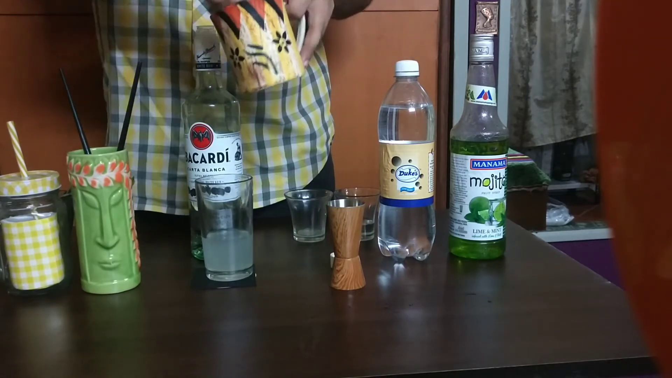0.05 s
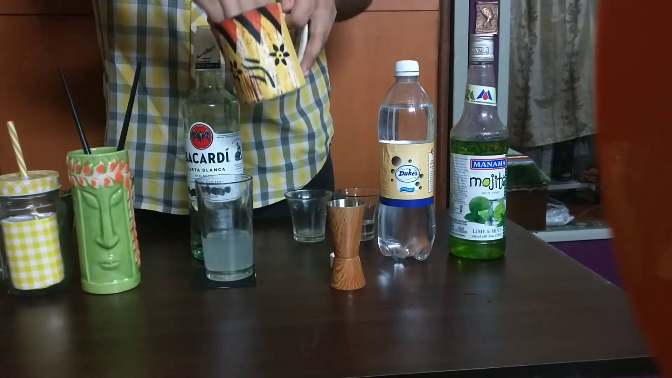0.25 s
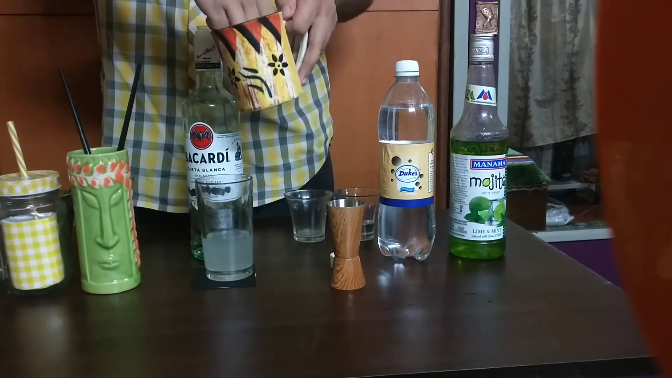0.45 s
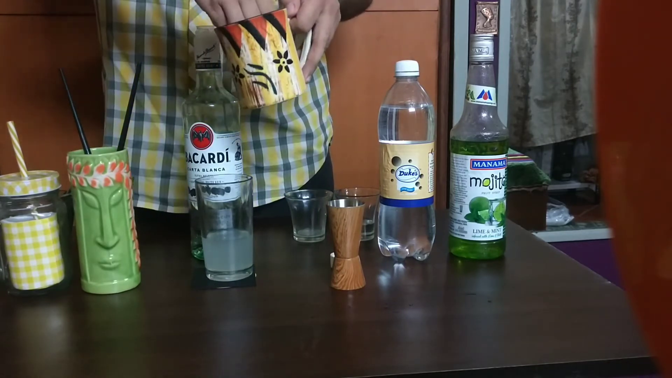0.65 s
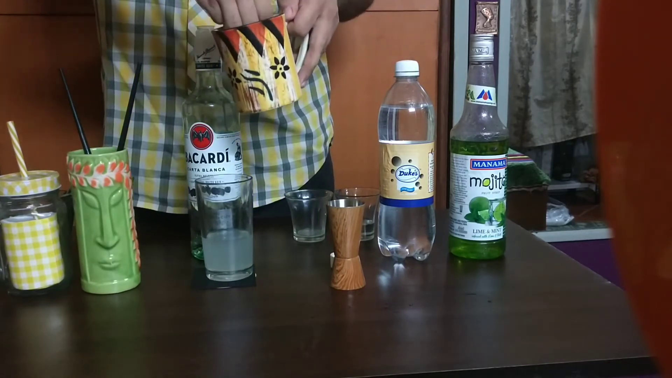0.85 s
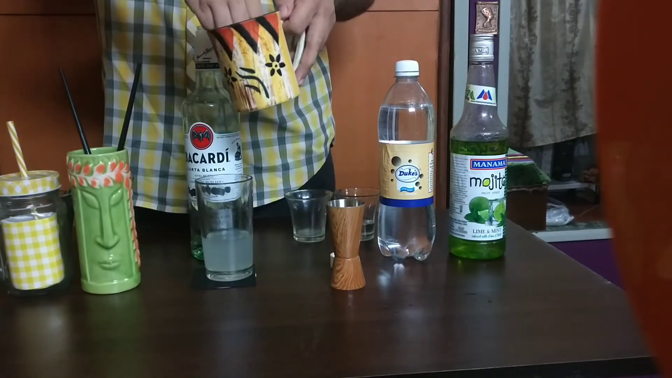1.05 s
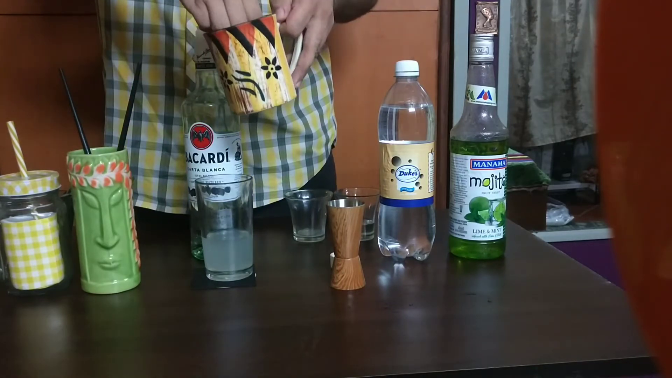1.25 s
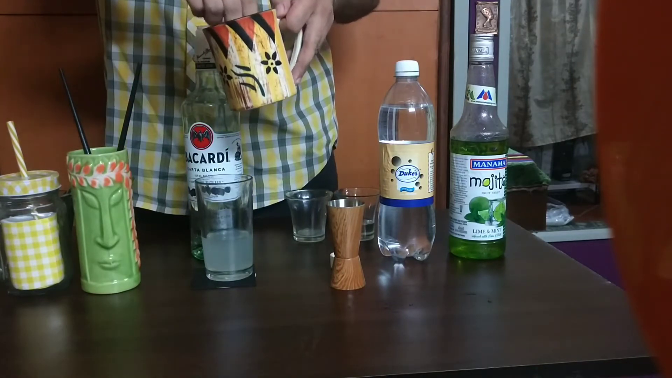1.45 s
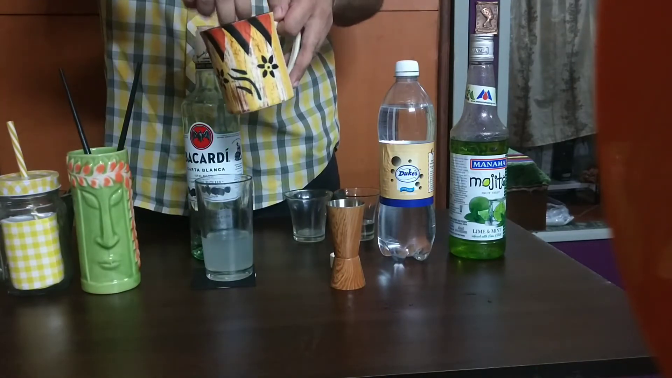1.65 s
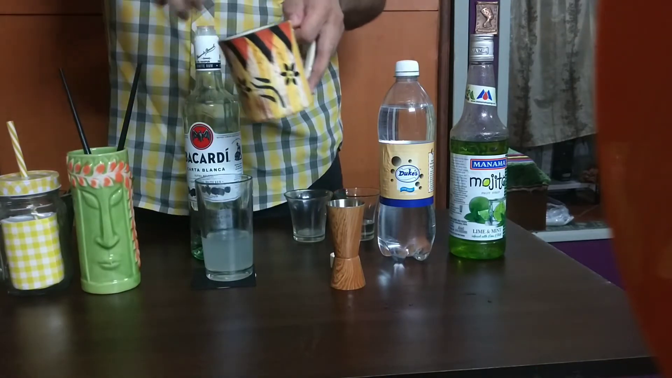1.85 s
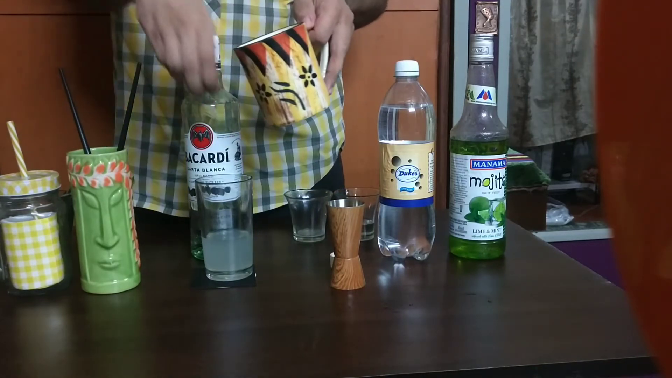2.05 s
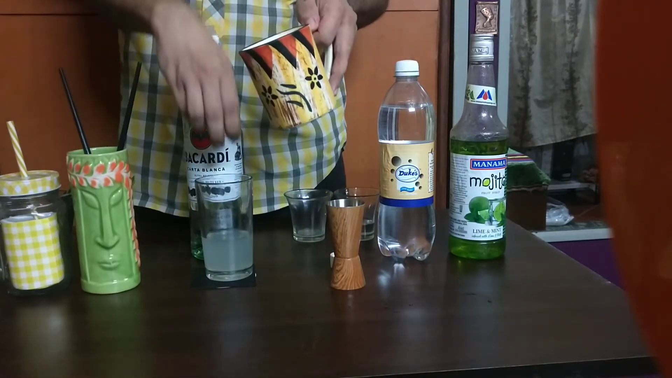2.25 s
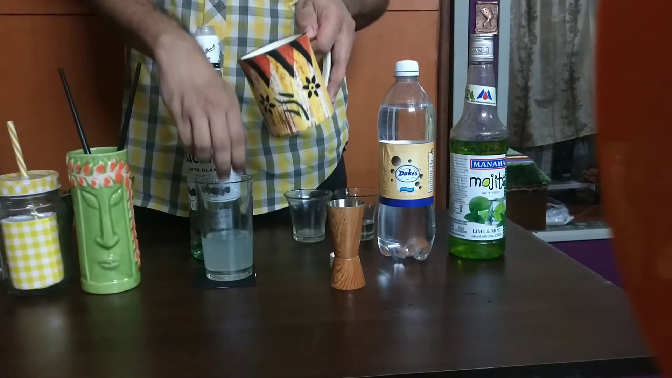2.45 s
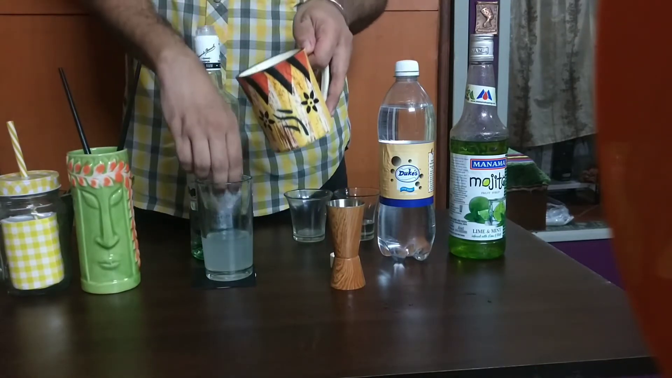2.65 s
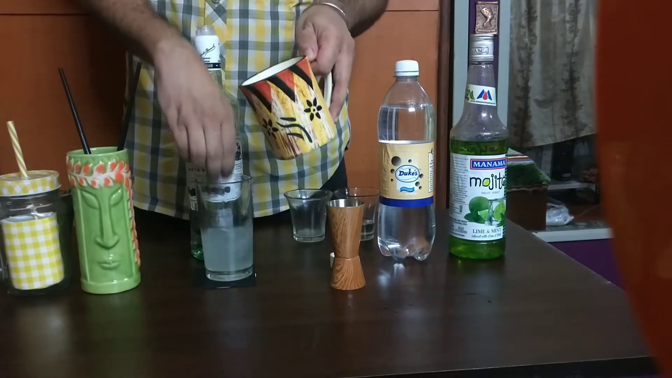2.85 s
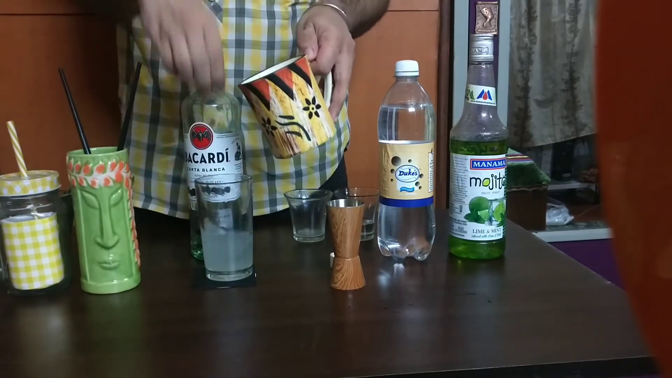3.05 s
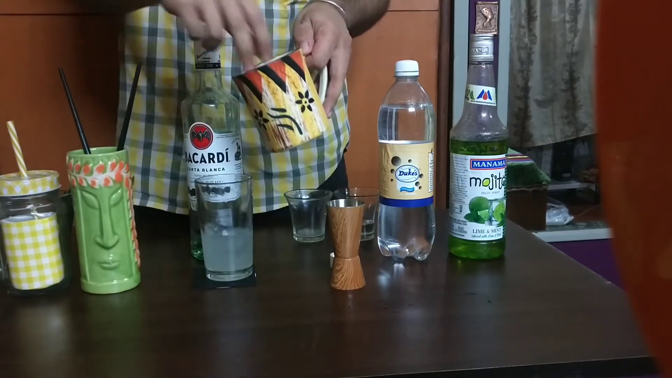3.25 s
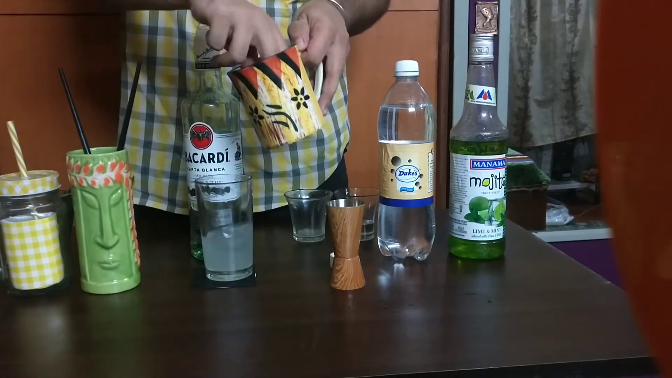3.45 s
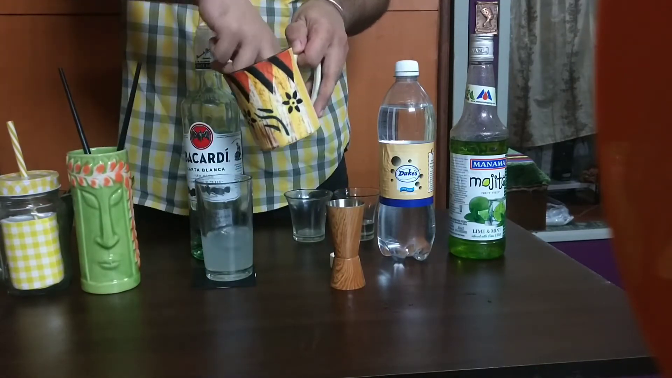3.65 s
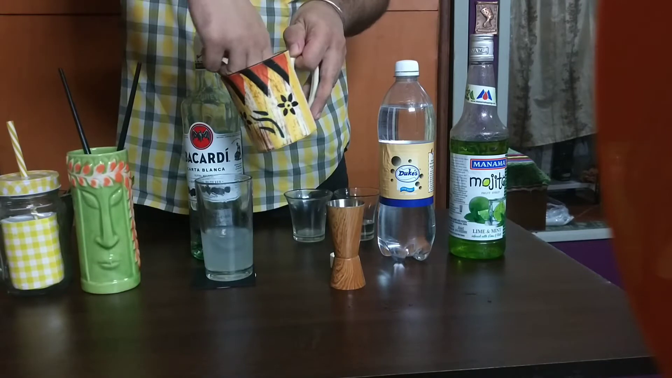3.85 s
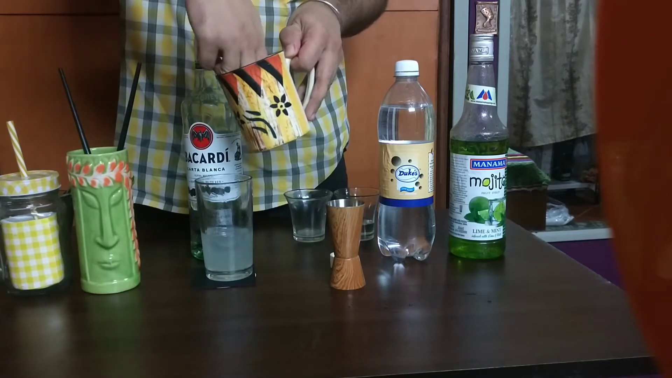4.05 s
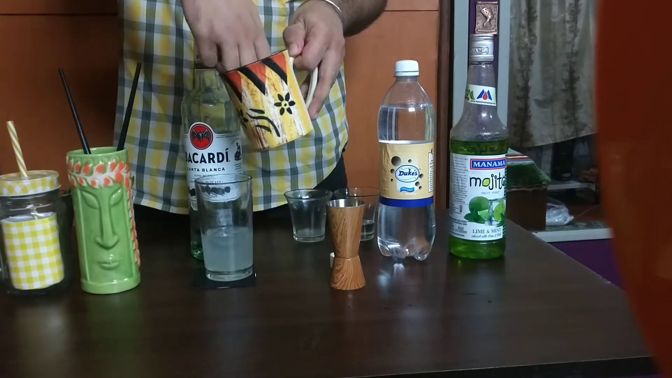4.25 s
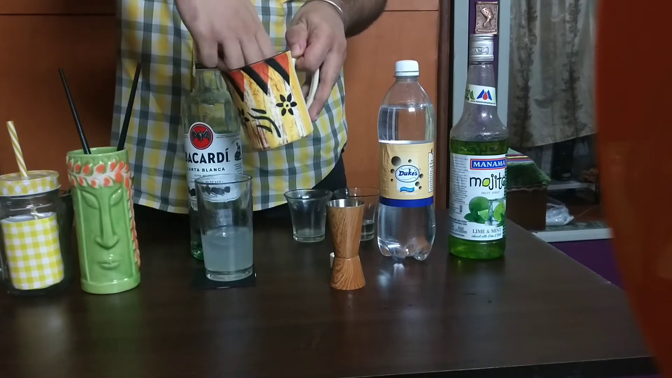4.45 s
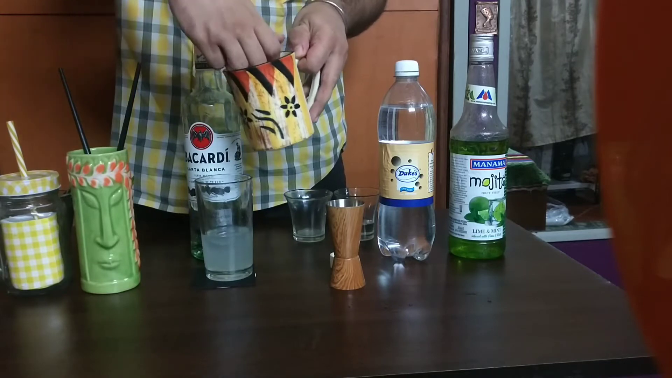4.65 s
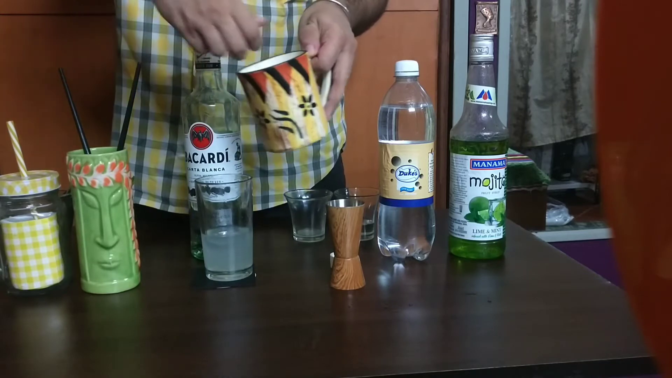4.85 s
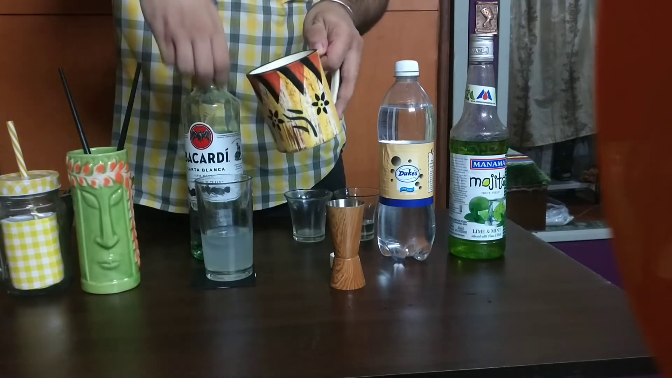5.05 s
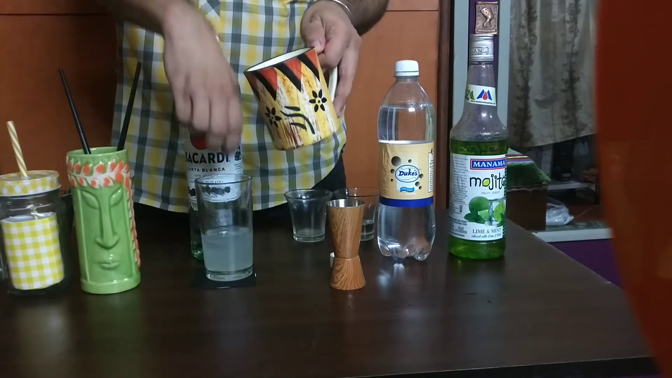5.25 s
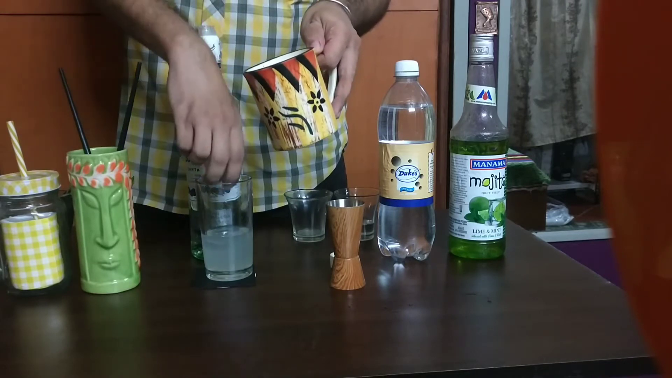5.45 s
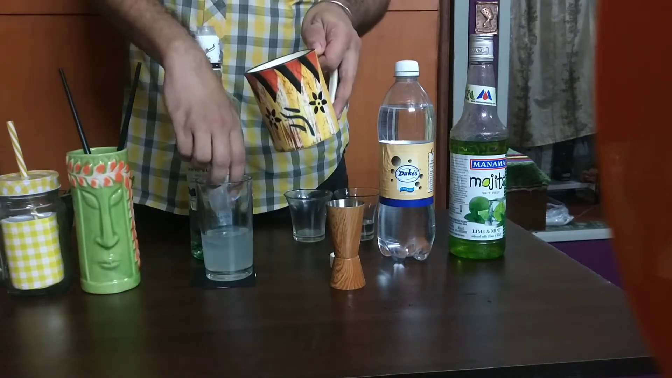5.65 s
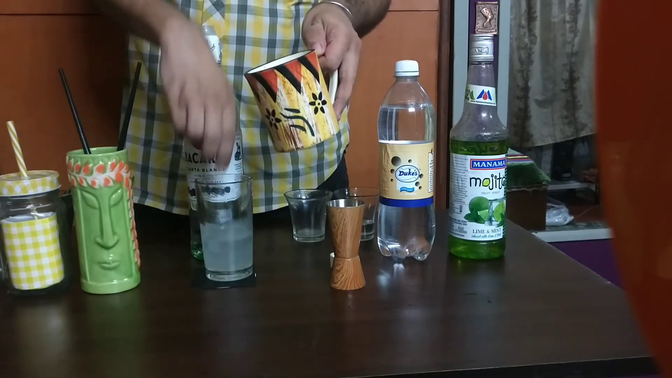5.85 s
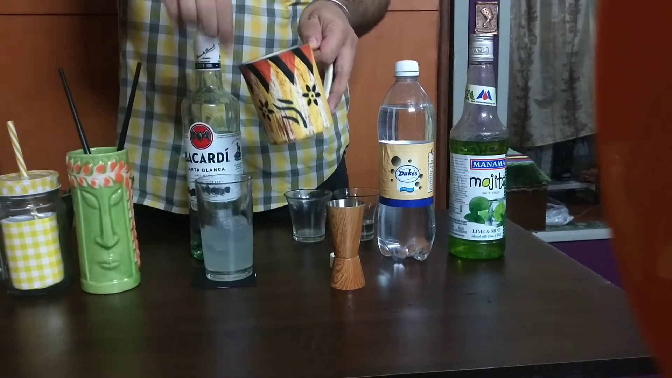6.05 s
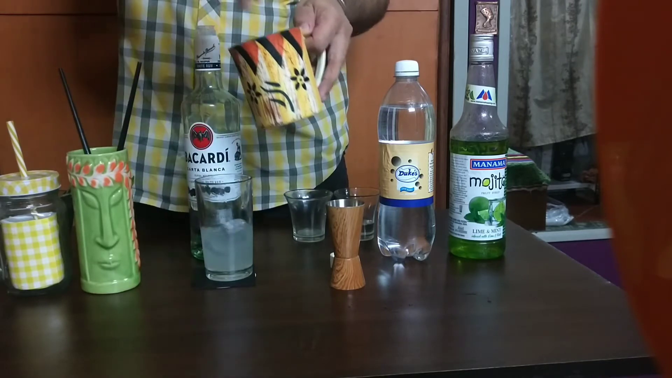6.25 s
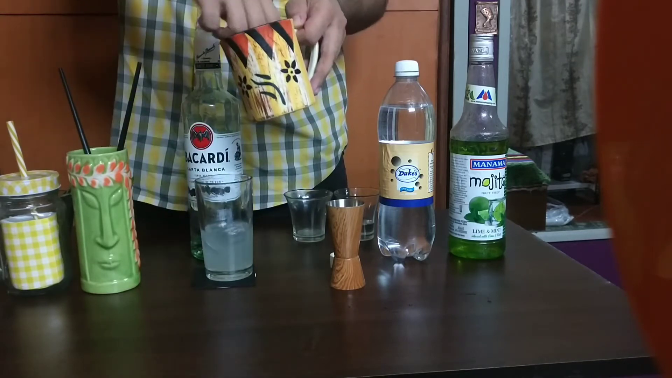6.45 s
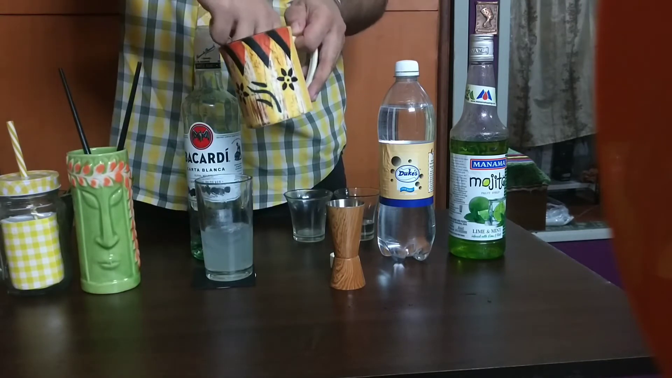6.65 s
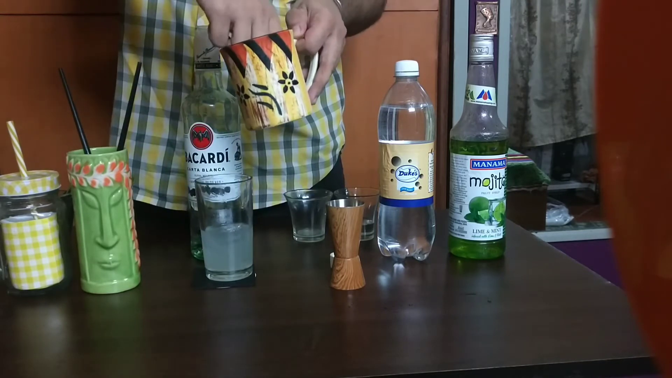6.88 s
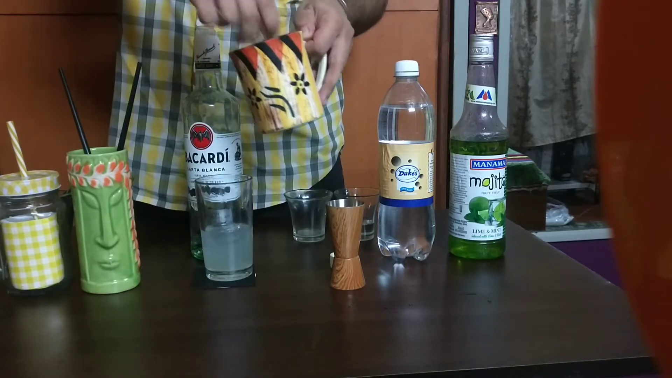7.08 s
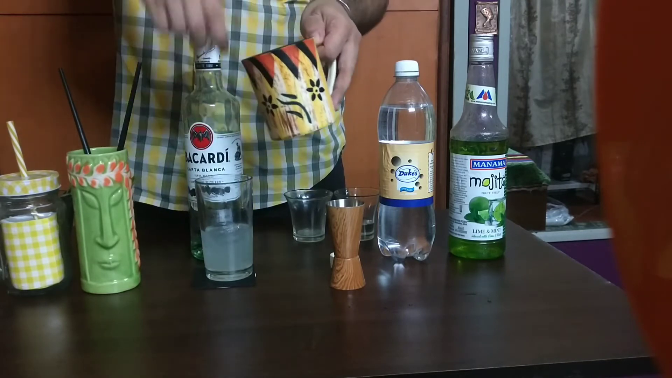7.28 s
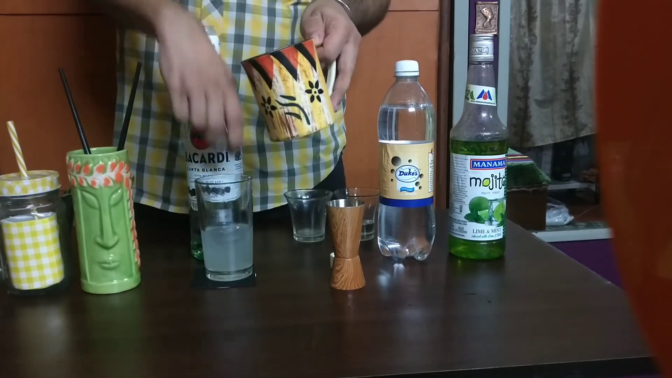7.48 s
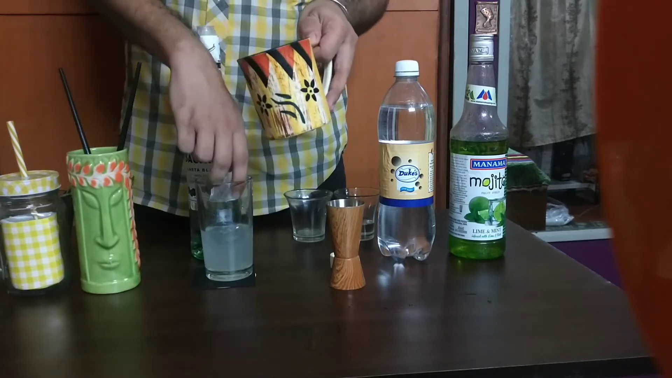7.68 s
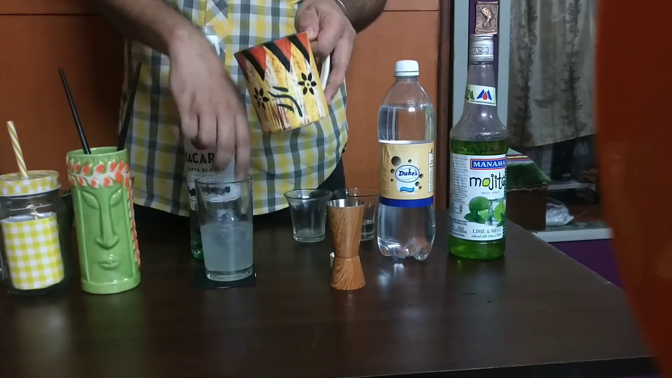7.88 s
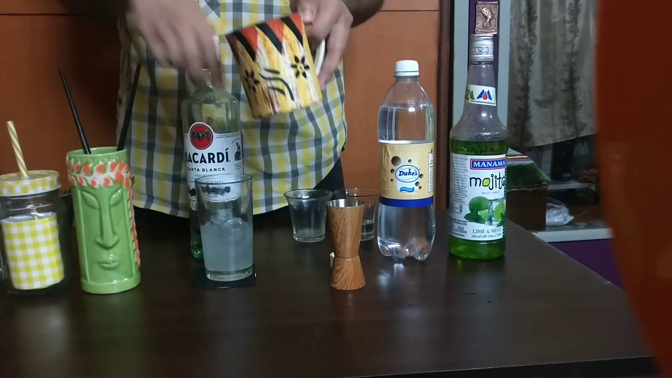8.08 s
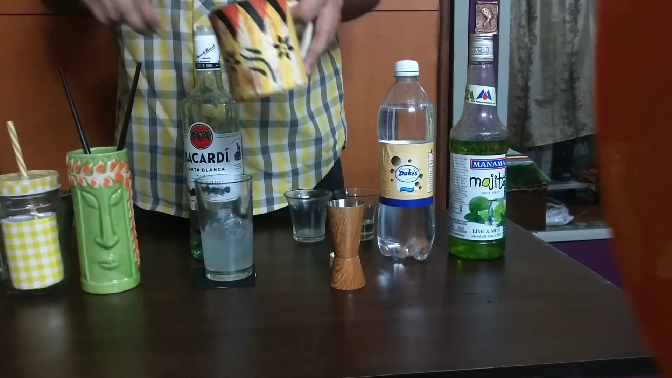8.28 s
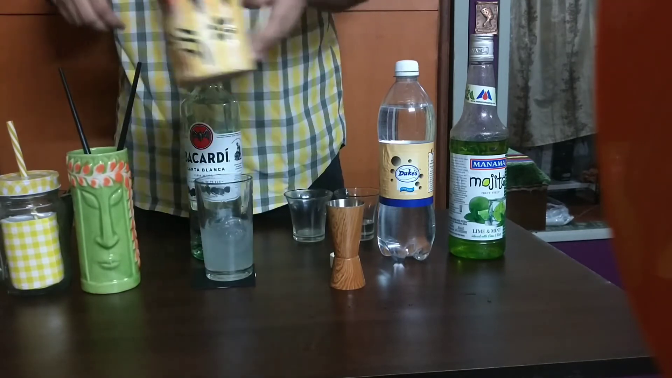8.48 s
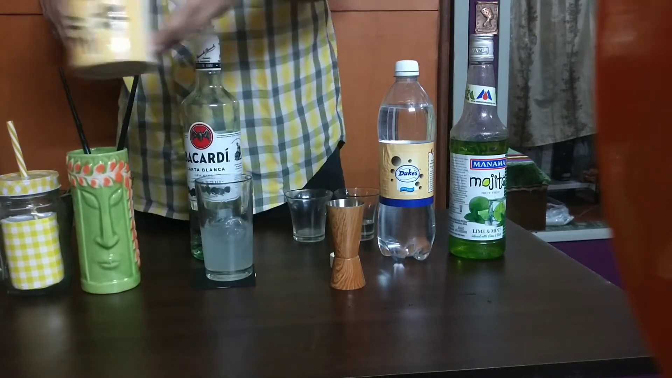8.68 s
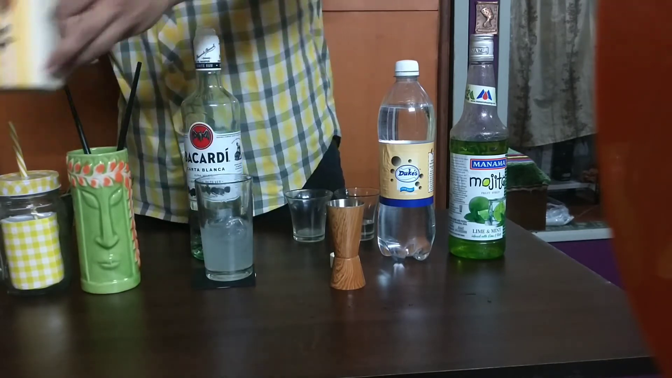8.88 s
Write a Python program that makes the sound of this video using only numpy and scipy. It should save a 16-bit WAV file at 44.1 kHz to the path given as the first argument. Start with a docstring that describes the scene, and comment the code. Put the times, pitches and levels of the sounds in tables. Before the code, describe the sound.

Close stereo microphones catch dull ceramic rattles as ice is shoved about in a mug, a pause, then bright clinks as cubes land in a partly filled glass. More rummaging leads to a second, longer-ringing drop, and a brief last rummage to a loud third one with a splash. Faint cloth rustle follows, over low hum and hiss in a small lively room.

```python
"""In a small hard room with a humming fan, fingers rummage among ice cubes in a china mug.
From 2.6 s cubes drop into a tall glass with a little drink: clink on the wall, landing, table knock, bubbles.
The mug is rummaged again, cubes fall at 5.5 s, there is a last short rummage, then more fall at 7.8 s.
Cloth rustles faintly at 1.7 s and at the end. A close pair of microphones hears it all, the right one later.
Contacts are shaped noise bursts, vessels and bubbles are decaying sines, slides and cloth are click streams."""
import sys
import numpy as np
from scipy import signal
from scipy.fft import rfft, irfft
from scipy.io import wavfile

SR = 44100
rng = np.random.default_rng(int(sys.argv[2]) if len(sys.argv) > 2 else 0)


def output_pcm(signal):
    """Save a mono or channel-first signal as 16-bit PCM at the path in sys.argv[1].

    Samples are clipped to [-1, 1] before scaling.
    """
    pcm = np.clip(np.atleast_2d(signal).T, -1, 1) * 32767
    wavfile.write(sys.argv[1], SR, np.round(pcm).astype(np.int16))


N = 393372
TIME = np.arange(N) / SR
EDGE_HZ = 15950  # upper band limit
FIRM_DB = -38.5  # table level of an ordinary firm blow, before any trim


def amp(db):
    """Decibels to gain."""
    return 10 ** (np.asarray(db) / 20)


def unit(x):
    """Scaled to rms 1."""
    return x / np.sqrt(np.mean(x ** 2) + 1e-20)


def read(points, hz):
    """A table of (frequency [Hz], value) joined by lines on a log frequency axis."""
    f, value = np.transpose(points)
    return np.interp(np.log(hz + 1), np.log(f + 1), value)


def add(mix, s, sound):
    """Lays a sound into the mix at s seconds."""
    part = mix[max(round(s * SR), 0):][:len(sound)]
    part += sound[:len(part)]


def bins(size=4096):
    """Frequencies [Hz] at which filters are drawn."""
    return np.fft.rfftfreq(size, 1 / SR)


def shape(x, db):
    """Minimum-phase filter, by folding the cepstrum, with the given gain [dB] at each of the bins."""
    cepstrum = irfft(np.log(amp(np.maximum(db, -100))))
    half = len(cepstrum) // 2
    cepstrum[1:half] *= 2
    cepstrum[half + 1:] = 0
    impulse = irfft(np.exp(rfft(cepstrum)))[:half]
    return signal.oaconvolve(x, impulse)[:len(x)]


def level_power(db):
    """Shifts a spectrum [dB] so that it leaves the power of white sound unchanged."""
    return db - 10 * np.log10(np.mean(amp(db) ** 2))


def colour(x, points, tilt_db=0):
    """Gives a white sound a spectrum, tilted [dB per octave] above 1 kHz, at unchanged power."""
    hz = bins()
    db = read(points, hz) + tilt_db * np.log2(np.clip(hz, 1000, EDGE_HZ))
    return shape(x, level_power(db))


def bump(hz, octaves):
    """Bell of height 1 around hz, over the bins."""
    return np.exp(-(np.log2((bins() + 1) / hz) / octaves) ** 2)


def dying(t60, size=SR):
    """One second of exponential decay, falling 60 dB in t60 seconds."""
    return np.exp(-np.log(1000) * TIME[:size] / max(t60, 1e-4))


def ring(modes):
    """Struck body: decaying sines of (frequency [Hz], level [dB], t60 [s])."""
    return sum(amp(db) * dying(t60) * np.sin(2 * np.pi * hz * TIME[:SR]) for hz, db, t60 in modes)


def crack(t60):
    """Brittle contact: a burst of noise of fixed energy."""
    fall = dying(t60)
    burst = fall * rng.standard_normal(SR)
    return burst * np.linalg.norm(fall) / np.linalg.norm(burst)


def grains(per_s, spread_db):
    """A stream of tiny clicks of uneven size and random sign, at rms 1."""
    size = amp(spread_db * np.minimum(rng.exponential(1, N), 3)) * rng.choice([-1, 1], N)
    return unit(size * (rng.random(N) < per_s / SR))


def stroke(s, rise_s, fall_s, db):
    """Speed of a sliding contact: it picks up, then friction slows it evenly to rest."""
    t = TIME - s
    return amp(db) * np.clip(np.minimum(t / rise_s, 1 - (t - rise_s) / fall_s), 0, 1)


def vessel(ice, modes, body_db):
    """Whatever the ice does also rings the vessel around it."""
    body = ring(modes)
    return ice + amp(body_db) * signal.fftconvolve(ice, body / np.sqrt(np.linalg.norm(body)))[:N]


# decay of the small hard room: (frequency [Hz], t60 [s])
ROOM_T60 = [(200, 0.19), (1000, 0.31), (3000, 0.32), (6000, 0.32), (10000, 0.26), (15000, 0.17)]


def room_tail(build_s=0.00035):
    """Dense reflections that build up quickly, each band dying at its own speed."""
    hz, t, z = signal.stft(rng.standard_normal(SR), SR, nperseg=256)
    t60 = read(ROOM_T60, hz)[:, None]
    z = z * np.exp(-np.log(1000) * t / t60) / np.sqrt(t60)
    tail = signal.istft(z, SR, nperseg=256)[1][:SR] * (1 - np.exp(-TIME[:SR] / build_s))
    return tail / np.linalg.norm(tail)


def place(x, wet, side, lag_s=.0002):
    """Direct sound, later at the right microphone, plus a separate room tail at each; side tilts the pair."""
    send, side_db = shape(x, read(wet, bins())), read(side, bins())
    mean_db = 10 * np.log10((amp(side_db) + amp(-side_db)) / 2)  # keeps the mean power of the pair
    left = x + signal.fftconvolve(send, room_tail())[:N]
    right = np.pad(x, (round(lag_s * SR), 0))[:N] + signal.fftconvolve(send, room_tail())[:N]
    return np.array([shape(left, side_db / 2 - mean_db), shape(right, -side_db / 2 - mean_db)])


# spectrum of the low rumble: (frequency [Hz], relative level [dB])
RUMBLE_COLOUR = [(20, -41.5), (30, -28), (42, -9.5), (60, -2), (85, 2.5), (130, -2.5), (190, -7),
                 (260, -16.5), (400, -29.5), (800, -77)]
# spectrum of the microphone hiss: (frequency [Hz], relative level [dB])
HISS_COLOUR = [(150, -6), (250, -4.5), (400, -8), (700, -9.5), (1000, -14.5), (2000, -16), (4000, -19.5),
               (7500, -26), (10000, -23.5), (13000, -19.5), (15500, -19.5)]


def rumble_and_hiss(rumble_db=-66, hiss_db=-73.5):
    """Low rumble and microphone hiss, each steady noise of its own spectrum."""
    rumble, hiss = rng.standard_normal((2, N))
    return amp(rumble_db) * colour(rumble, RUMBLE_COLOUR) + amp(hiss_db) * colour(hiss, HISS_COLOUR)


def drift():
    """Slow random wander of standard deviation 1 at its knots, about three a second."""
    knots = np.linspace(0, N / SR, num=30)
    return np.interp(TIME, knots, rng.standard_normal(len(knots)))


def hum_tone(hz, db, level_waver=0.15, phase_waver_rad=0.6):
    """One sine of the hum, wandering slowly in strength and phase."""
    strength = amp(db) * np.sqrt(2) * (1 + level_waver * drift())
    return strength * np.sin(2 * np.pi * hz * TIME + phase_waver_rad * drift())


# fan and mains hum: (frequency [Hz], rms level [dB])
HUM = [(58, -67), (100, -62.5), (116, -76), (150, -85), (250, -86), (300, -83.5), (400, -94.5)]
# how alike rumble and hiss are at the two microphones: (frequency [Hz], likeness [0 to 1])
LIKENESS = [(60, 0.71), (150, 0.87), (300, .7), (700, 0.13), (2000, 0), (15000, 0.025)]


def background(left_db=0.42):
    """Wavering fan and mains hum over low rumble and microphone hiss, a shade louder on the left."""
    middle, b = rumble_and_hiss(), rumble_and_hiss()
    same = np.clip(read(LIKENESS, bins()), 0, .999)
    side = shape(b, 10 * np.log10((1 - same) / (1 + same)))
    hum = sum(hum_tone(hz, db) for hz, db in HUM)
    return np.array([(middle + side + hum) * amp(left_db), (middle - side + hum) * amp(-left_db)])


# the sleeve brushes as the arm moves: (time [s], rise [s], fall [s], peak level [dB])
BRUSHES = [(1.68, 0.13, 0.086, -78.5), (7.95, 0.17, .21, -75.5), (8.32, 0.013, 0.027, -58),
           (8.33, .05, 1.4, -79.5)]
# spectrum of the cloth: (frequency [Hz], relative level [dB])
SLEEVE_COLOUR = [(200, -15), (600, -4.5), (1100, 2.5), (1800, -1), (3500, -0.5), (6000, -15),
                 (12000, -11.5)]


def sleeve():
    """Soft rustle of cloth: dense tiny clicks that follow the speed of each brush."""
    return sum(stroke(*row) for row in BRUSHES) * colour(grains(per_s=2800, spread_db=3.5), SLEEVE_COLOUR)


# a finger shoves the cubes, which slide to rest: (time [s], at rest [s], level before trim [dB])
SHOVES = [(0, 0.104, -49), (0.084, 0.192, -43), (0.179, 0.365, -50.5), (0.382, 0.524, -53.5),
          (3.341, 3.638, -50), (3.43, 3.672, -49.5), (3.63, 3.997, -51), (3.995, 4.15, -56),
          (4.118, 4.286, -58), (4.382, 4.705, -56), (4.646, 4.754, -48.5), (6.428, 6.484, -52.5),
          (6.484, 6.72, -49.5), (6.616, 6.815, -58), (6.838, 6.95, -60), (6.973, 7.087, -58)]
# spectrum of ice on china, for scrapes and knocks: (frequency [Hz], relative level [dB])
MUG_COLOUR = [(240, -26), (400, -22.5), (569, -17.5), (809, -3), (914, -8), (1280, -8.5), (1750, -11),
              (2400, -0.5), (2670, -5.5), (3060, -4), (5390, -14), (6190, -12), (8030, -23), (10300, -9),
              (15500, -15)]


def mug_scrape(trim_db=-9.0, note_db=13, note_octaves=0.26, count=8, rise_s=0.002):
    """After each shove the cubes slip in tiny jerks and small knocks, every contact point with its own pitch."""
    drag = sum(stroke(s, rise_s, rest_s - s, db) for s, rest_s, db in SHOVES)
    slips = np.zeros(N)
    for hz in np.geomspace(1600, 6500, count):
        slips += shape(grains(per_s=24, spread_db=3.5), note_db * bump(hz, note_octaves))
    return amp(trim_db) * drag * colour(unit(slips), MUG_COLOUR, tilt_db=-0.87)


# cubes knock inside the mug: (time [s], level before trim [dB], treble snap [dB], pitch [Hz])
MUG_KNOCKS = [(0.0276, -35, -11.5, 2360), (0.0966, -28.5, -14, 3400), (.1123, -34.5, -3, 2480),
              (.1845, -36.5, -10, 5940), (.2054, -42.5, 5, 1760), (.419, -35.5, -13, 2370),
              (0.461, -33.5, -6.5, 2260), (0.7858, -52, -9, 2420), (.9822, -49.5, -40, 2490),
              (3.3422, -39.5, -7.5, 2330), (3.4703, -34, -7, 2280), (3.5029, -31.5, -18, 2270),
              (3.5613, -30, -16, 3040), (3.5779, -36.5, -28, 3100), (3.6392, -44, 9, 3080),
              (3.7728, -34.5, -19, 3020), (3.8411, -40, -21, 3000), (3.967, -40.5, -10, 3300),
              (4.0017, -32, -28, 3520), (4.129, -28.5, 1, 6650), (4.381, -31.5, 4, 2210),
              (4.4879, -40, -3.5, 3060), (4.6545, -33, -6, 2470), (4.658, -32, -3, 3500),
              (4.803, -43.5, -28, 3400), (4.814, -52, -26, 3500), (6.4842, -42.5, 1, 2120),
              (6.5444, -41, 3.5, 3450), (6.6105, -35.5, -28, 3700), (6.6288, -43, 10, 3500),
              (6.8605, -43, -34, 2320), (6.9464, -41, -6, 2430), (6.985, -37, -1.5, 2030)]
# lows of a knock up to firm [dB], and their change per dB above it
LOW_DB, LOW_PER_DB = -7, -0.72


def mug_knocks(trim_db=1.5, knock_t60=0.0085, note_db=8, note_octaves=0.25):
    """Each knock is a crack with its own pitch and snap; above a firm blow, harder means thinner lows."""
    out = np.zeros(N)
    for s, level_db, snap_db, hz in MUG_KNOCKS:
        low_db = LOW_DB + LOW_PER_DB * max(level_db - FIRM_DB, 0)
        hardness = [(1400, low_db), (2000, 0.95), (4000, 0), (9000, snap_db)]  # (frequency [Hz], gain [dB])
        db = read(MUG_COLOUR, bins()) + read(hardness, bins()) + note_db * bump(hz, note_octaves)
        add(out, s, amp(level_db + trim_db) * shape(crack(knock_t60), level_power(db)))
    return out


# bubbles: (time [s], middle pitch at the start [Hz], level before trim [dB])
BUBBLES = [(2.874, 647, -39.5), (2.898, 600, -45), (2.919, 1046, -37.5), (2.93, 1020, -63),
           (5.938, 1450, -51.5), (6.016, 1047, -46), (6.319, 956, -53.5), (7.927, 1210, -50.5),
           (8.17, 1080, -63)]


def bubbles(rise_per_s=6.3, onset_s=0.00053, t60=0.0235, spread=0.067, stagger_s=0.00239, trim_db=-3, count=3):
    """Air breaks into a few bubbles of like size; each rings briefly and rises in pitch near the surface."""
    out, t = np.zeros(N), TIME[:SR]
    swell = dying(t60) * (1 - np.exp(-t / onset_s))
    for s, hz, db in BUBBLES:
        for k, size in enumerate(rng.permutation(np.linspace(-1, 1, count))):
            turns = hz * (1 + spread * size) * (t + rise_per_s * t ** 2 / 2) + rng.random()
            add(out, s + k * stagger_s, amp(db + trim_db) * swell * np.sin(2 * np.pi * turns))
    return out


# a cube lands in the drink:
# (time [s], table thud before trim [dB], air column before trim [dB], splash [dB])
LANDINGS = [(2.608, -53, -60, -54), (2.65, -74, -59, -54), (2.716, -47, -69, -53), (2.768, -57, -54, -73),
            (2.819, -49.5, -63, -70), (2.874, -49, -55, -62.5), (5.499, -44.5, -67.5, -69),
            (5.695, -41.5, -49.5, -60), (5.711, -44.5, -79, -54), (5.742, -48.5, -50, -72),
            (7.779, -45, -53, -30.5), (7.806, -42.5, -44, -38)]
# modes of the knocked table: (frequency [Hz], relative level [dB], t60 [s])
TABLE_MODES = [(197.8, -0.5, 0.21), (263, -3.5, 0.11), (339, -11.5, 0.33), (514, 0.5, 0.04)]
# modes of the air above the drink: (frequency [Hz], relative level [dB], t60 [s])
AIR_MODES = [(1205, 6.5, 0.088), (1025, 12, 0.037), (1343, -3, 0.065)]
# spectrum of the spray: (frequency [Hz], relative level [dB])
SPLASH_COLOUR = [(200, 0), (500, -5), (800, -12.5), (1200, 2), (1900, -15.5), (3400, 7), (4200, -1.5),
                 (5050, 10), (5600, -11), (6300, 2.5), (7500, 2), (9000, 5), (15500, -0.5)]


def landings(splash_t60=0.1, thud_trim_db=-2.0, air_trim_db=-3, rise_s=0.0073):
    """The cube thumps glass and table, sounds the air column and throws a fine spray."""
    out, spray = np.zeros(N), np.zeros(N)
    soft = 1 - np.exp(-TIME[:SR] / rise_s)
    for s, table_db, column_db, splash_db in LANDINGS:
        thud = amp(table_db + thud_trim_db) * ring(TABLE_MODES)
        column = amp(column_db + air_trim_db) * ring(AIR_MODES)
        add(out, s, soft * (thud + column))
        add(spray, s, amp(splash_db) * dying(splash_t60))
    return out + colour(spray * grains(per_s=3600, spread_db=4.0), SPLASH_COLOUR)


# ice on the glass wall: (time [s], tick level before trim [dB], pitch of the cube [Hz],
# ring level [dB], ring pitch [Hz], ring t60 [s])
CLINKS = [(2.6086, -36, 10060, -32, 2617, 0.083), (2.648, -34, 14000, -26, 2616, 0.068),
          (2.7666, -51, 9500, -45.5, 2598, 0.93), (2.8779, -50.5, 13700, -40.5, 2588, 0.27),
          (2.989, -62, 10370, -61, 2590, 0.2), (3.1237, -52, 9460, -39.5, 2598, 0.39),
          (5.498, -39.5, 13900, -32, 2588, 0.048), (5.631, -64, 9800, -47, 2603, .55),
          (5.6568, -38.5, 11440, -25, 2592, 0.86), (5.733, -34, 13500, -42, 2570, 0.33),
          (5.759, -81, 9100, -27, 2558, 0.26), (5.803, -69, 9100, -42, 2580, .5),
          (5.847, -45.5, 9000, -46, 2577, 0.91), (5.9763, -50, 8860, -42.5, 2580, 0.46),
          (6.1409, -54, 9150, -63, 2562, 0.77), (6.404, -61.5, 9050, -48.5, 2584, 0.064),
          (7.7807, -22.5, 9740, -30, 2584, 0.22), (7.8068, -45, 9800, -31.5, 2566, 0.39)]
# higher round modes of the wall: (ratio to the lowest, level before hardness [dB], longest t60 [s])
WALL_MODES = [(2.471, -11, .3), (2.42, -17.5, .3), (2.56, -14, .081), (4.408, -4, .11), (5.37, -18, .08)]
# a harder blow is a shorter contact, so the overtones are brighter:
# their tilt at a firm blow [dB per octave], and its growth per dB of tick
FIRM_OVERTONE_DB, OVERTONE_PER_DB = -7, 0.29


def glass_wall(hard_rise_s=0.00027, soft_rise_s=0.0079, catch_s=0.0013, twin_hz=29, twin_db=-16):
    """The wall rings until the next contact catches it. Its lowest mode is a pair of twins;
    the place of the blow picks one, and the other beats weakly against it."""
    out, t = np.zeros((2, N)), TIME[:SR]
    ends = [row[0] for row in CLINKS[1:]] + [N / SR]
    for (s, tick_db, _, db, hz, t60), end in zip(CLINKS, ends):
        over_db = FIRM_OVERTONE_DB + OVERTONE_PER_DB * (tick_db - FIRM_DB)
        rise_s = np.interp(tick_db, [-70, -58], [soft_rise_s, hard_rise_s])  # a grazing cube swells the ring gently
        upper = int(hz > 2581)
        other_hz = hz - twin_hz if upper else hz + twin_hz
        modes = [(hz, 0, t60), (other_hz, twin_db, t60)]
        for ratio, mode_db, mode_t60 in WALL_MODES:
            modes.append((hz * ratio, mode_db + over_db * np.log2(ratio), min(mode_t60, t60)))
        held = (1 - np.exp(-t / rise_s)) * np.exp(-np.maximum(s + t - end, 0) / catch_s)
        add(out[upper], s, amp(db) * held * ring(modes))
    return out


# spectrum of a tick: (frequency [Hz], relative level [dB])
TICK_COLOUR = [(50, -13), (150, -1.5), (500, -10.5), (1100, -0.5), (1800, -10), (3300, -0.5), (5000, -8),
               (5600, -2), (6400, 10), (7800, -24.5), (9500, 1.5), (15500, 0)]


def ice_tick(tilt_db, cube_hz, crack_t60=0.0092, cube_db=-5, cube_t60=0.024):
    """A sharp crack and the brief high note of the cube itself."""
    return colour(crack(crack_t60), TICK_COLOUR, tilt_db) + ring([(cube_hz, cube_db, cube_t60)])


# ice knocking on ice, or cracking in the drink:
# (time [s], level before trim [dB], tilt [dB per octave], pitch of the cube [Hz])
TICKS = [(2.709, -38.5, 2, 13900), (2.7173, -35.5, 1, 12850), (2.811, -51, -4.5, 10500),
         (2.987, -57, 12, 10300), (5.6945, -39, -2.5, 9960), (5.7076, -45, -6, 9800),
         (5.7291, -35, 15, 9320), (5.7424, -37, 23, 13400), (5.7489, -39, 12, 8970),
         (5.9375, -54.5, 0, 9150), (6.049, -50, -2, 9200), (7.7774, -22, 1, 9030), (7.8037, -28, 7, 10040),
         (8.1667, -53, 5, 9100), (8.5298, -48.5, 18, 9080), (8.5492, -53, 7, 13600)]
# a harder clink is brighter: tilt at a firm blow [dB per octave], and its growth per dB of tick
FIRM_TICK_TILT_DB, TICK_TILT_PER_DB = -1.6, 0.14


def ice_in_glass(clink_trim_db=3, tick_trim_db=3):
    """Contacts of cubes with the wall or other ice, and cracks in the drink, each a sharp tick."""
    out = np.zeros(N)
    for s, db, hz, *_ in CLINKS:
        tilt_db = FIRM_TICK_TILT_DB + TICK_TILT_PER_DB * (db - FIRM_DB)
        add(out, s, amp(db + clink_trim_db) * ice_tick(tilt_db, hz))
    for s, db, tilt_db, hz in TICKS:
        add(out, s, amp(db + tick_trim_db) * ice_tick(tilt_db, hz))
    return out


# stiff modes of the thick glass base and the cubes in it: (frequency [Hz], relative level [dB], t60 [s])
BASE_MODES = [(3420, -19, 0.23), (5060, -11, 0.19), (4970, -12, .2), (5760, -4, .14), (6265, 9, 0.34),
              (6750, -29, .12), (8830, -7, .14), (9866, -17, .16)]
# modes of the china mug: (frequency [Hz], relative level [dB], t60 [s])
MUG_MODES = [(816, 0, 0.19), (1866, -7, 0.11), (2145, 1, 0.21), (2424, 3.5, 0.085), (3170, 4, 0.034),
             (3590, -1, 0.077), (4770, -12, 0.055), (6280, 5, 0.055), (10100, -6, 0.026)]
# room against direct sound, (frequency [Hz], level [dB]): glass, its ring,
# mug knocks, and handling of the mug, which faces away
GLASS_WET = [(200, -6.5), (1000, 6), (4000, 4.5), (7000, -4.5), (10000, -4), (15000, -6.5)]
RING_WET = [(500, -5.5), (2600, -8.5), (6400, -2.5), (12000, 0.5)]
KNOCK_WET = [(300, 7.5), (3000, -2), (6000, 7.5), (12000, 4)]
MUG_WET = [(300, 8.5), (3000, 4.5), (12000, 6)]
# left microphone against right, (frequency [Hz], level [dB]): glass, lower twin, upper twin, mug
GLASS_SIDE = [(200, -3.5), (900, 4), (2600, -1.5), (4000, -0.5), (6500, -2.5), (8000, 3), (9800, 20),
              (11000, 28), (13500, 8), (15500, 29)]
LOW_TWIN_SIDE = [(2600, 1.5), (6400, 3), (11400, 12), (14000, 30)]
HIGH_TWIN_SIDE = [(2600, 8), (6400, 3), (11400, 15), (14000, 9.5)]
MUG_SIDE = [(60, 6), (110, 0), (200, -5), (380, -10.5), (700, 5.5), (1290, 2), (2380, 3), (4400, -1.5),
            (8120, 4.5), (15000, 19)]


def scene():
    """Glass, mug and sleeve in the room, before the close pair of microphones."""
    struck = vessel(ice_in_glass() + landings(), BASE_MODES, body_db=-36.5)
    glass = place(struck + bubbles(), GLASS_WET, GLASS_SIDE)
    low_twin, high_twin = glass_wall()  # their lobes point different ways
    low_chime = place(low_twin, RING_WET, LOW_TWIN_SIDE, lag_s=.00006)
    high_chime = place(high_twin, RING_WET, HIGH_TWIN_SIDE, lag_s=.00017)
    knocks = place(vessel(mug_knocks(), MUG_MODES, body_db=-35.0), KNOCK_WET, MUG_SIDE)
    handling = place(vessel(mug_scrape(), MUG_MODES, body_db=-42) + sleeve(), MUG_WET, MUG_SIDE)
    return glass + low_chime + high_chime + knocks + handling + background()


def record(dry):
    """The recorder's band limit: a steep low-pass at EDGE_HZ."""
    lowpass = signal.firwin(511, EDGE_HZ, window=("kaiser", 9), fs=SR)
    return signal.oaconvolve(dry, lowpass[None], "same")


dry = scene()
out = record(dry)
output_pcm(out)
```